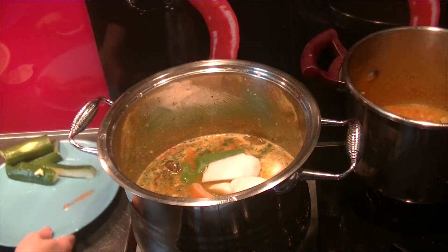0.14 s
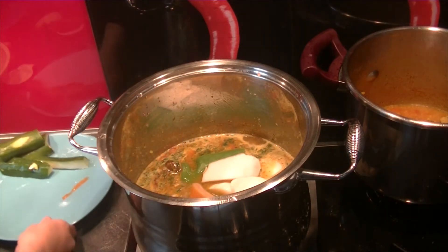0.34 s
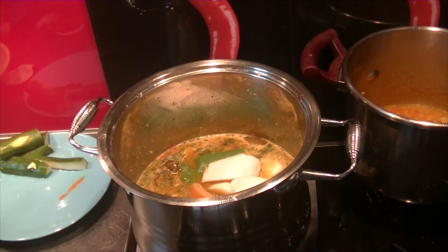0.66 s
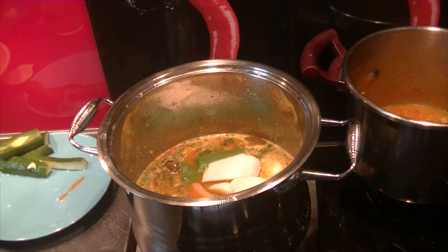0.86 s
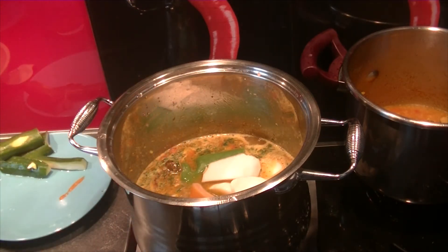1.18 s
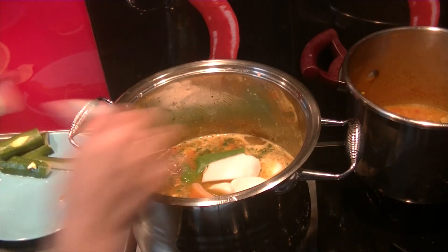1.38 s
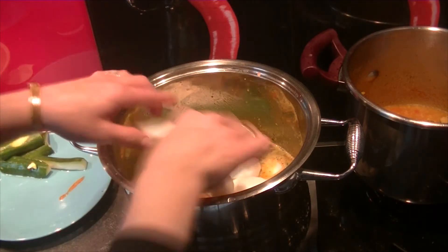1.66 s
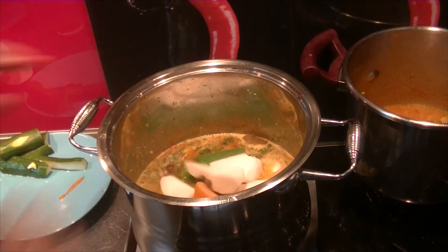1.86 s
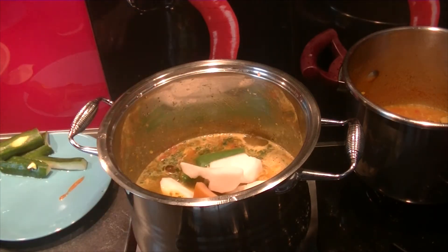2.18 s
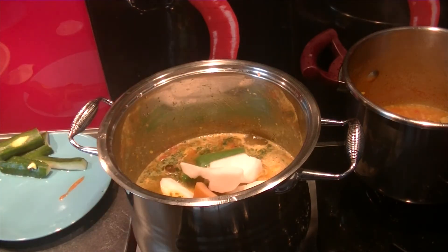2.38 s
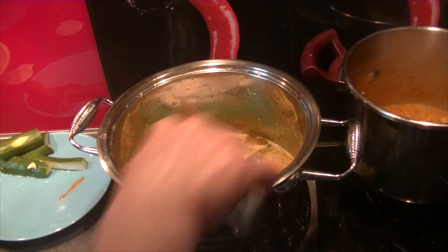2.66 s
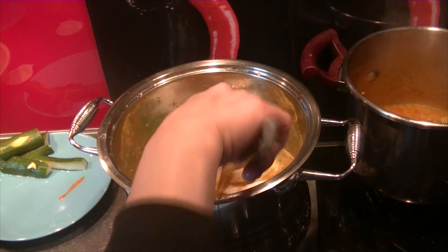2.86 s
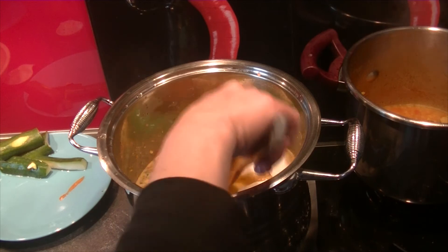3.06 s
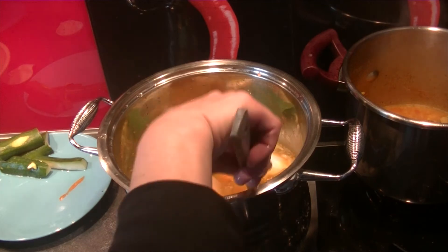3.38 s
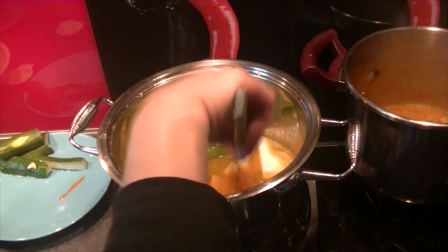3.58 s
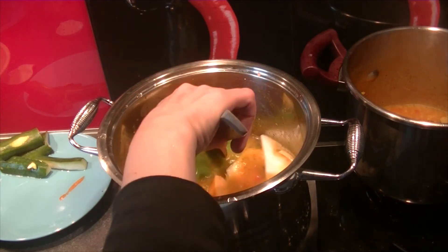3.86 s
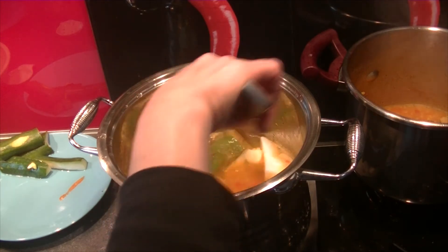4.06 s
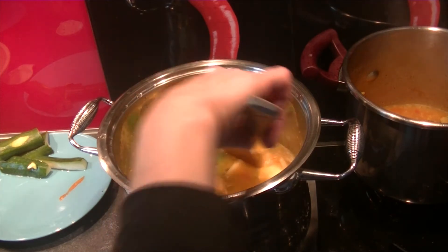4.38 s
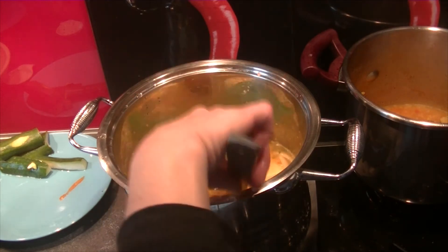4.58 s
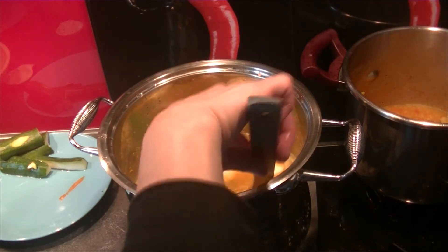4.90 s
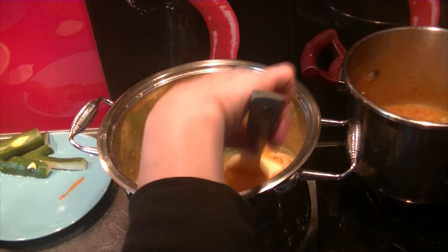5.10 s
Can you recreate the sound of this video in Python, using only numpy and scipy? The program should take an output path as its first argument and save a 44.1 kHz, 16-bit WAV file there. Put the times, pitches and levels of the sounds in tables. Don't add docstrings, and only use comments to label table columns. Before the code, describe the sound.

Right at the start a plate bangs on the worktop, loud enough to overload, rubs briefly, and a board lands in a quick flurry of knocks. After that the simmering pot dominates: soft hiss, bubbling pops, tiny spits on hot metal. A spoon strikes lightly and stirs with small metallic ticks, then a muffled thud lands late. Close small-camera stereo in a lively little kitchen, with faint low worktop rumble.

```python
import sys
import numpy as np
from scipy import signal
from scipy.fft import rfft, irfft, next_fast_len
from scipy.io import wavfile
from scipy.ndimage import uniform_filter1d

SR = 44100
rng = np.random.default_rng(int(sys.argv[2]) if len(sys.argv) > 2 else 0)


def boost(x):
    u = np.asarray(x, float) / 20
    return 10 ** u


def persist_wave(psi):
    counts = np.round(np.clip(psi, -1, 1) * 32767).astype(np.int16)
    wavfile.write(sys.argv[1], SR, np.atleast_2d(counts).T)


N = 230552

# hz, level_db (per Hz)
SIMMER_SPECTRUM = [(20, -22), (60, -18), (256, -18), (380, -6), (715, -10.5), (1090, -1.5), (1410, -5.5),
                   (1780, 0.5), (2650, -8.5), (3420, -7.5), (4120, -9), (7570, -11.5), (10000, -15),
                   (11000, -23.5), (16000, -22)]


def evened(x):
    return x / np.sqrt(np.mean(x ** 2) + 1e-20)


def read(points, hz):
    f, value = np.transpose(points)
    return np.interp(np.log(hz + 1), np.log(f + 1), value)


def curve(points, t):
    s, value = np.transpose(points)
    return np.interp(t, s, value)


def add(mix, s, sound):
    part = mix[..., round(s * SR):][..., :sound.shape[-1]]
    part += sound[..., :part.shape[-1]]


def resonate(x, hz, width):
    pole = np.exp((2j * np.pi * hz - np.pi * width) / SR)
    return signal.lfilter([1], np.poly([pole, pole]), x).real


def causal(gain_db):
    log_gain = np.log(boost(np.r_[gain_db, gain_db[-2:0:-1]]))
    return np.fft.ifft(np.exp(np.conj(signal.hilbert(log_gain)))).real[:2048]


def pot_db(hz):
    # hz, width_hz, lift_db
    resonances = [(375.2, 46, 8.5), (472.8, 32, 8.5), (1050, 102, 4), (1120, 48, 4.5), (1474, 5.5, 12.5),
                  (1730, 540, -2.5), (1930, 62, 1.5), (3400, 256, 7), (5000, 530, 5.5), (7677, 79, 4),
                  (7500, 95, 5.5), (14900, 900, 4)]
    return sum(db / (1 + (2 * (hz - f) / width) ** 2) for f, width, db in resonances)


def simmer(patchy_db=1.0, flicker_db=1.1):
    # start_s, level_db
    simmer_level = [(0.0, -41), (0.38, -36.5), (0.5, -38.5), (0.8, -39), (4.9, -39), (5.23, -37.5)]
    # start_s, treble_db
    stir = [(0.55, 0), (0.72, 0.5), (0.75, -0.2), (2.1, 1.1), (3.49, 0), (3.73, 2), (3.77, -2.2), (3.84, 1),
            (4.07, -2), (4.2, 3), (4.24, -5.5), (4.28, -0.2), (4.53, 0.4), (4.62, 2), (4.69, -0.5),
            (4.89, -0.2), (5.15, -1.5), (5.2, -0.5)]
    stir_from_hz, calm_below_hz = 2900, 1200
    frames, hz = N // 128 + 6, np.fft.rfftfreq(512, 1 / SR)
    a, b, c, d, patches, flicker = rng.standard_normal((frames, 257, 6)).T
    patches = uniform_filter1d(patches, size=6, axis=0)
    patches = evened(uniform_filter1d(patches, size=20, axis=1))
    flicker = uniform_filter1d(flicker, size=110, axis=0)
    flicker = evened(uniform_filter1d(flicker, size=6, axis=1))
    rows = hz[:, None]
    calm = 1 - 0.5 / (1 + (rows / calm_below_hz) ** 4)
    stirred = curve(stir, np.arange(frames) * 128 / SR - 256 / SR)
    stirred = stirred / (1 + (stir_from_hz / (rows + 1)) ** 4)
    softer_treble = -1.5 * (rows > 4500)
    field = boost(calm * (patchy_db * patches + flicker_db * flicker) + stirred + softer_treble)
    noise = np.array([a + 1j * b, c + 1j * d])
    hiss = signal.istft(noise * field, nperseg=512, noverlap=384)[1][:, :N]
    size = next_fast_len(N)
    hz = np.fft.rfftfreq(size, 1 / SR)
    colour = boost(read(SIMMER_SPECTRUM, hz) + pot_db(hz))
    hiss = evened(irfft(rfft(hiss, size) * colour, size)[:, :N])
    return hiss * boost(curve(simmer_level, np.arange(N) / SR) - 1.5)


def bubbles(low_hz, high_hz, per_s, spread_db, level_db, cycles):
    out = np.zeros((2, N))
    for hz in np.geomspace(low_hz, high_hz, num=16):
        t = np.arange(int(4 * cycles / hz * SR)) / SR
        chirp = np.sin(2 * np.pi * hz * t * (1 + 0.0077 * hz * t))
        chirp *= np.exp(-2 * t * hz / cycles) * np.minimum(t * hz, 1)
        bursts = rng.random((2, N)) < per_s / 16 / SR
        size = bursts * 1.
        size[bursts] = boost(spread_db * np.minimum(rng.exponential(1, bursts.sum()), 3.5))
        loud = boost(read(SIMMER_SPECTRUM, hz) + pot_db(hz)) * hz
        out += loud * signal.oaconvolve(size, chirp[None], axes=1)[:, :N]
    return boost(level_db) * evened(out)


def damped_rings(rows, noisy, room_db, attack_cycles, spread=0.71):
    t, out = np.arange(8000) / SR, np.zeros(N)
    for s, db, hz, t60 in rows:
        burst = evened(resonate(rng.standard_normal(len(t)), hz, spread * hz))
        ring = np.sin(2 * np.pi * hz * t) + noisy * burst
        attack = np.minimum(t * hz / attack_cycles, 1)
        add(out, s, boost(db - 60 * t / t60) * ring * attack)
    wet = boost(room_db) * signal.oaconvolve(out[None], kitchen(), axes=1)[:, :N]
    return wet + out * np.array([[1], [0]])


def clear_pops():
    # start_s, peak_db, pitch_hz
    bursts = [(0.818, -36, 2420), (1.0146, -31, 2010), (1.11, -32, 1730), (1.1604, -32.5, 3420),
              (1.401, -32.5, 1730), (1.655, -43, 1820), (1.711, -35, 1140), (2.12, -34, 2000),
              (2.14, -28, 2330), (2.7754, -34, 3320), (3.001, -31.5, 1930), (3.137, -31.5, 2540),
              (3.1855, -48, 1690), (3.2735, -37, 1880), (3.699, -38, 1950), (3.72, -34, 2020),
              (3.7474, -35, 2200), (3.7838, -32.5, 1390), (3.975, -29.5, 2350), (4.1744, -30, 2300),
              (4.2188, -39, 2150), (5.157, -42, 1840)]
    t60_s = 0.027
    return damped_rings([(*row, t60_s) for row in bursts], noisy=0.56, room_db=-6.5, attack_cycles=3.1)


def fizz():
    # start_s, peak_db, pitch_hz
    bursts = [(2.371, -30, 5000), (2.952, -27.5, 4900), (3.284, -25, 3740), (3.5644, -36, 3510),
              (3.6446, -37, 4680), (3.7054, -33, 3570), (3.7878, -29, 3650), (3.8337, -31, 5100),
              (4.0525, -37, 5000), (4.0844, -37, 6800), (4.1076, -39, 5070), (4.1544, -39, 3400),
              (4.62, -27, 3500)]
    t60_s = 0.013
    return damped_rings([(*row, t60_s) for row in bursts], noisy=0.59, room_db=-13.0, attack_cycles=4.0)


def spits():
    # start_s, peak_db, pitch_hz
    drops = [(0.602, -33, 4820), (0.632, -34, 7380), (0.6784, -33, 5150), (0.9314, -37, 7390),
             (1.0425, -35, 4650), (1.3184, -35, 4960), (1.5189, -34, 4480), (1.5858, -30.5, 5400),
             (1.657, -30, 4350), (1.712, -29, 4150), (1.8424, -34, 5490), (1.9904, -27, 4850),
             (2.3999, -29, 4170), (2.5955, -33, 5130), (2.7736, -34, 4950), (3.0689, -39, 5170),
             (3.1358, -34, 4180), (3.1817, -32, 4680), (3.4256, -35, 5050), (3.4684, -42, 4940),
             (3.712, -31, 4360), (3.8674, -35, 4100), (4.1394, -41, 4380), (4.2737, -36, 4870),
             (4.3114, -38, 4250), (4.4144, -28.5, 4960), (4.557, -35, 4960), (4.7142, -32, 4980),
             (4.8424, -31.5, 6930), (4.9781, -39, 4510), (5.0584, -40, 4570), (5.1582, -38, 5130),
             (5.1696, -33, 5000)]
    t60_s, level_db = 0.018, -4.5
    rows = [(s, db + level_db, hz, t60_s) for s, db, hz in drops]
    return damped_rings(rows, noisy=0.93, room_db=-23.0, attack_cycles=1.3)


def small_rings():
    # start_s, peak_db, pitch_hz, t60_s
    pure_rings = [(0.712, -38, 479, 0.065), (0.922, -43, 425, .06), (0.969, -41, 1090, .04),
                  (1.184, -34, 1040, .05), (1.2218, -34, 3330, 0.022), (1.23, -36, 1140, .04),
                  (1.328, -36, 1120, .04), (1.421, -34, 1070, 0.036), (2.0998, -35, 3490, .02),
                  (2.705, -33, 2000, .025), (3.137, -31, 2480, 0.032), (3.49, -38, 368, 0.21),
                  (3.63, -37.5, 373, .1), (3.982, -35.5, 415, 0.052), (4.0525, -33, 5000, .02),
                  (4.1076, -34, 4850, .02), (4.383, -41, 433, 0.11), (4.409, -39, 1150, .04),
                  (4.44, -36, 2140, .02), (4.862, -41, 473, .15), (5.014, -39, 494, 0.13),
                  (0.0385, -14, 820, .04), (0.307, -33, 400, .06), (0.424, -23, 342, 0.049),
                  (0.445, -28, 515, 0.068), (0.445, -33.5, 197, .2), (0.462, -29, 790, 0.092),
                  (2.2, -24, 2050, .025), (2.203, -24, 2500, .025), (2.21, -35, 520, .12),
                  (2.335, -36, 1050, 0.072), (4.885, -35, 845, 0.048), (4.886, -35, 475, 0.063),
                  (2.368, -41, 1060, 0.11), (4.8435, -34, 1540, 0.046)]
    return damped_rings(pure_rings, noisy=0.26, room_db=-11.5, attack_cycles=1.7, spread=0.32)


def knock(blows, colour, rings, ring_db, room_db, near, scatter_db, scatter_s=0.0063):
    crack = causal(read(colour, np.fft.rfftfreq(4096, 1 / SR)))
    crack = crack / abs(crack).max()
    t, out = np.arange(SR // 3) / SR, np.zeros((2, N))
    for s, db, top_hz in blows:
        share = rng.choice([-1, 1], len(rings)) * rng.uniform(0.45, 1, len(rings))
        ring = np.zeros(len(t))
        for k, (hz, level_db, t60) in zip(share, rings):
            ring += k * boost(level_db - 60 * t / t60) * np.sin(2 * np.pi * hz * t)
        echo = kitchen()[:, :len(t)] * (boost(room_db) + boost(scatter_db) * np.exp(-t / scatter_s))
        sound = signal.fftconvolve(crack[None], echo, axes=1)[:, :len(t)]
        sound += boost(ring_db) * ring * np.array([[1], [0.6]])
        sound[0, :len(crack)] += near * crack
        soft = signal.butter(3, top_hz, fs=SR, output="sos")
        add(out, s, boost(db) * signal.sosfilt(soft, sound))
    return out


def plate():
    # start_s, peak_db, brightness_hz
    blows = [(.0061, 2.5, 5400), (.0082, -8.5, 3470), (.0131, -12, 3000), (.0255, -2.5, 1300),
             (.047, -10, 1800), (.060, -11, 1500)]
    # hz, level_db (per Hz)
    colour = [(59, -44), (100, -26), (194, -20), (246, -27), (272, -13.5), (375, -6), (607, -9),
              (760, -8.5), (960, -4.5), (1350, -10), (2100, -7.5), (3600, -17), (4900, -28.5), (6200, -27),
              (12000, -34), (15600, -90), (22000, -120)]
    # pitch_hz, level_db, t60_s
    rings = [(201, -19.5, 0.39), (363, -8, 0.12), (844, -11, 0.2), (975, -17, 0.6), (1010, -0.5, 0.065),
             (1520, -23, 0.14), (1700, -13, 0.14), (2030, -6, 0.3), (2200, -4.5, 0.088), (3210, -13, 0.22),
             (4600, -18, 0.073)]
    return knock(blows, colour, rings, ring_db=-14.5, room_db=-1.5, near=1.0, scatter_db=-10.0)


def board():
    # start_s, peak_db, brightness_hz
    blows = [(.397, -14, 1600), (.4005, -9, 3800), (.4035, -10, 3000), (.4062, -4.5, 6040),
             (.409, -2, 2980), (.4155, -0.5, 2210), (.428, -17, 2020), (.4385, -15, 4000),
             (.450, -15, 1190), (.4665, -15, 1500), (.475, -21, 5500)]
    # hz, level_db (per Hz)
    colour = [(59, -71), (100, -34), (194, -26), (241, -32), (346, -19), (423, -10), (497, -8), (787, -4.5),
              (1270, -4.5), (1980, -5), (3700, -13.5), (5000, -14.5), (6300, -24), (12000, -33),
              (15600, -75), (22000, -120)]
    # pitch_hz, level_db, t60_s
    rings = [(197.7, -30, 0.56), (350, -8, 0.079), (501, 5, 0.095), (785, -9.5, 0.18), (960, -2, 0.11),
             (1120, -9, 0.3), (1500, -9, 0.11), (1634, -7, 0.17), (2010, -4.5, 0.13), (2470, -20, 0.13),
             (3330, 2, 0.074), (4600, -5.5, 0.061)]
    return knock(blows, colour, rings, ring_db=-18.5, room_db=-4.5, near=0.84, scatter_db=1.0)


def spoon():
    # start_s, peak_db, brightness_hz
    blows = [(2.1918, -13.5, 5500), (2.197, -17.5, 4000), (2.202, -22, 2600), (2.221, -26, 2600),
             (2.249, -21, 2200), (2.2525, -18, 1800), (2.257, -24, 1700), (2.268, -22, 800),
             (2.290, -28, 2500), (2.305, -21, 1210), (2.34, -29, 1200), (2.37, -28, 1200)]
    # hz, level_db (per Hz)
    colour = [(120, -55), (200, -22.5), (453, -9.5), (1140, -5), (2430, -3), (3130, -9), (4350, -25),
              (5600, -35), (7000, -27), (9100, -56), (15400, -120)]
    # pitch_hz, level_db, t60_s
    rings = [(493, -16.5, 0.2), (584, -17, 0.38), (654, -23.5, 0.53), (885, -18, 0.08), (1477, -3, 0.047),
             (1900, -10, 0.027), (2300, -5, 0.03), (2720, -5, 0.069)]
    return knock(blows, colour, rings, ring_db=-8.0, room_db=-1.0, near=0.9, scatter_db=-5.0)


def step():
    # start_s, peak_db, brightness_hz
    blows = [(4.8428, -26.5, 2500), (4.8452, -26, 3500), (4.853, -33, 1500), (4.882, -33, 2600),
             (4.887, -31, 1100), (4.900, -28, 1200), (5.020, -33.5, 900), (5.070, -34, 900)]
    # hz, level_db (per Hz)
    colour = [(59, -32), (100, -6), (490, 3), (609, -7), (816, 1), (1130, -3), (1320, -3), (1610, 0),
              (4000, -6), (5200, -53), (8800, -120)]
    # pitch_hz, level_db, t60_s
    rings = [(366, -5, 0.22), (487, -2, 0.22), (807, -1, 0.12), (1090, -4, 0.19), (1620, 5, 0.048),
             (2090, -12, .05)]
    return knock(blows, colour, rings, ring_db=-12, room_db=-5, near=1.1, scatter_db=-8.0)


def drag():
    # start_s, level_db
    pressure = [(0.1, -48), (0.15, -42.5), (0.21, -44), (0.31, -36.5), (0.36, -41), (0.395, -38)]
    squeak_db, squeak_fade_db_per_s = 3, -26
    t = np.arange(pressure[0][0], pressure[-1][0], 1 / SR)
    grit = rng.standard_normal((4, len(t)))
    low = evened(resonate(grit[:2], 328, 127) + 0.44 * resonate(grit[:2], 622, 99))
    high = evened(resonate(grit[2:], 2120, 230) + 5.9 * resonate(grit[2:], 3140, 680))
    no_bass = signal.butter(4, 250, "high", fs=SR, output="sos")
    low = signal.sosfilt(no_bass, low)
    rub = low + boost(squeak_db + squeak_fade_db_per_s * (t - t[0])) * high
    out = np.zeros((2, N))
    add(out, t[0], boost(curve(pressure, t)) * rub * signal.windows.tukey(len(t), .1))
    return out


def spoon_ticks():
    # start_s, peak_db, pitch_hz, t60_s
    touches = [(3.7205, -25, 3200, 0.014), (3.7225, -28, 2690, 0.019), (3.7235, -31.5, 2030, 0.023),
               (3.8592, -19, 2750, 0.011), (3.8625, -31, 2160, 0.019), (4.2155, -35, 6450, .012),
               (4.618, -28, 4600, 0.012), (4.768, -31, 2240, 0.017), (4.8455, -30.5, 1620, 0.041),
               (2.2505, -29, 1520, 0.033), (2.1925, -25, 2340, 0.034)]
    return damped_rings(touches, noisy=0.4, room_db=-9.5, attack_cycles=1.0)


def clinks():
    # start_s, peak_db, pitch_hz, t60_s
    steel = [(2.195, -35.5, 4410, 0.18), (2.213, -36, 4450, 0.07), (2.235, -43, 3900, .1),
             (2.262, -37, 5100, 0.05), (0.011, -33, 5350, 0.1), (0.012, -30, 4600, 0.049)]
    return damped_rings(steel, noisy=0.45, room_db=-9, attack_cycles=12.0)


def bumps():
    # start_s, peak_db, pitch_hz, t60_s
    contacts = [(0.288, -26, 296, 0.11), (0.305, -34, 404, 0.084), (0.33, -45, 292, 0.071),
                (0.372, -26, 377, 0.048), (0.399, -9.5, 333.3, 0.058), (0.455, -43, 200, .15),
                (1.77, -26, 472, 0.036), (2.883, -37, 1012, 0.091), (2.889, -34.5, 944, 0.12),
                (3.149, -41.5, 345, 0.16), (3.273, -35.5, 1120, 0.12), (3.488, -34.5, 479, 0.13),
                (3.628, -36, 1120, 0.06), (4.135, -39.5, 470, 0.11), (4.488, -32.5, 432, 0.042),
                (4.846, -34.5, 143, 0.18), (4.884, -36, 645, 0.093), (5.022, -40, 477, 0.06),
                (5.042, -43, 423, 0.061), (5.152, -39, 371, 0.068)]
    return damped_rings(contacts, noisy=0.39, room_db=-10.0, attack_cycles=2.06, spread=0.21)


def brief_rings():
    # start_s, peak_db, pitch_hz, t60_s
    contacts = [(0.32, -33.5, 2050, .2), (0.12, -33, 2300, .07), (0.275, -34, 2350, 0.045),
                (0.29, -42, 3800, .12), (1.7661, -36, 1940, .02), (2.16, -40, 3400, 0.067),
                (2.6082, -34, 2400, .012), (2.897, -37, 375, 0.18), (3.27, -38.5, 400, 0.091),
                (3.8344, -30, 2340, 0.025), (4.3, -32, 1700, 0.037), (4.9, -46, 3450, .06),
                (4.298, -30, 1370, 0.018), (4.8435, -32.5, 720, 0.028), (2.192, -21.5, 1500, 0.033),
                (2.254, -28, 1450, 0.036), (4.856, -27, 1600, .02), (4.866, -35, 530, 0.029),
                (4.893, -30, 500, 0.035), (4.5, -38, 450, 0.039), (4.8475, -33, 2650, .015),
                (4.8815, -28, 2200, .02), (4.865, -36, 330, 0.12), (4.5, -42, 306, 0.12),
                (2, -39.5, 340, 0.066), (1.6, -44.5, 120, .12), (1.775, -40, 600, 0.046),
                (0.33, -35.5, 1260, 0.065), (0.52, -35, 5600, 0.018), (0.0125, -13, 2000, .02),
                (0.0235, -11.5, 950, 0.026), (2.89, -37, 2450, 0.057), (4.888, -35, 750, 0.057)]
    return damped_rings(contacts, noisy=0.37, room_db=-6.0, attack_cycles=1.5)


def shaking_db():
    # start_s, peak_db, held_s
    leans = [(0.02, -74, .03), (0.12, -66, 0.045), (0.72, -75, .08), (1.0, -72, .02), (1.24, -70, 0.096),
             (1.61, -73, .03), (1.73, -59, .03), (1.8, -52, 0.017), (1.88, -62, .12), (2.8, -69, .05),
             (2.94, -61, .02), (3.04, -62, .02), (3.19, -67, .03), (3.3, -63, 0.025), (3.44, -55.5, 0.051),
             (3.56, -55, 0.057), (3.7, -67, .07), (3.845, -64, .02), (3.96, -67, .03), (4.16, -68.5, 0.1),
             (4.48, -68, .09), (4.64, -69, .01), (4.91, -51, 0.041), (5.04, -54, .05), (5.16, -58, .05)]
    rise_db_per_s, fall_db_per_s, rest_db = 233, 193, -82
    t = np.arange(0, N + 64, 64) / SR
    s, db, held = np.transpose(leans)[:, :, None]
    rise = rise_db_per_s * np.maximum(s - t, 0)
    fall = fall_db_per_s * np.maximum(t - s - held, 0)
    power = boost(2 * (db - rise - fall)).sum(axis=0) + boost(2 * rest_db)
    return np.interp(np.arange(N) / SR, t, 10 * np.log10(power))


def hum():
    level_db = shaking_db()
    waver = evened(uniform_filter1d(rng.standard_normal(N), size=3000))
    tone = np.sqrt(2) * np.sin(2 * np.pi * np.cumsum(57.5 + 2.0 * waver) / SR)
    thump = evened(resonate(rng.standard_normal((2, N)), 27, 30))
    rumble = evened(resonate(rng.standard_normal((2, N)), 204, 140))
    shaken = boost(level_db) * (tone * np.array([[1.2], [0]]) + 0.3 * thump)
    return shaken + boost(0.4 * level_db - 37.5) * rumble


def kitchen():
    # hz, t60_s
    decay = [(150, 0.41), (500, 0.33), (2000, 0.32), (6000, 0.35), (12000, 0.076)]
    taps_in = np.zeros((2, SR // 3))
    slots = np.arange(60, SR // 3 - 12, 12)
    at = slots + rng.integers(0, 12, (2, len(slots)))
    np.put_along_axis(taps_in, at, rng.choice([-1., 1.], at.shape), 1)
    hz, t, z = signal.stft(taps_in, SR, nperseg=128)
    tail = signal.istft(z * boost(-60 * t / read(decay, hz)[:, None]), SR, nperseg=128)[1]
    return tail / np.linalg.norm(tail[0])


def ports(first, second, aside=((1, 0), (2, 0))):
    # hz, likeness (0 to 1)
    likeness = [(55, .95), (110, .3), (200, .15), (340, .85), (500, .85), (680, .7), (900, .88),
                (2000, .82), (4000, .8), (6000, .7), (8000, .7), (9300, .62), (11000, .33), (15000, .5)]
    # hz, level_db
    louder = [(55, 4), (200, 2), (340, 6.5), (700, 8), (1100, 6), (1800, 2), (3000, 0), (5000, 0),
              (6100, 2), (7100, 8), (8100, 6), (9300, 0), (11000, -3), (13000, 2)]
    # hz, phase_rad
    leads = [(55, 0), (340, -.1), (680, -.1), (1100, -.5), (1800, -.5), (3000, -.1), (6000, .2),
             (7100, -.3), (8100, -1.2), (9300, -1.6), (11000, -.6), (15000, -.4)]
    size = next_fast_len(N + 8192)
    hz, a, b = np.fft.rfftfreq(size, 1 / SR), rfft(first, size), rfft(second, size)
    same = np.clip(read(likeness, hz), 0, 1)
    right = same * np.exp(-1j * read(leads, hz)) * a + np.sqrt(1 - same ** 2) * b
    half = boost((read(louder, hz) + read(aside, hz)) / 2)
    return irfft(np.array([a * half, right / half]), size)[:, :N]


def scene():
    # hz, extra_left_minus_right_db
    knock_side = [(250, 0), (600, 2.2), (1500, 1.5), (4000, .3)]
    small = drag() + plate() + board() + spoon() + step()
    small += clear_pops() + fizz() + spoon_ticks() + clinks() + bumps()
    no_bass = signal.butter(6, 150, "high", fs=SR, output="sos")
    small = signal.sosfilt(no_bass, small)
    small = small - signal.lfilter(*signal.iirpeak(243, 6.5, fs=SR), small)
    small += small_rings()
    broth = simmer()
    broth += bubbles(1485, 13910, per_s=250, spread_db=3.0, level_db=-51.5, cycles=11.6)
    broth += bubbles(3640, 12300, per_s=300, spread_db=2.5, level_db=-66, cycles=4.5)
    broth += spits() + brief_rings() + hum()
    return ports(*small, aside=knock_side) + ports(*broth)


def top_cut(x):
    return signal.sosfilt(signal.butter(12, 15790, fs=SR, output="sos"), x)


def record(dry):
    limited = np.clip(dry, -1, 1)
    edge = signal.firwin(1023, 15760, window=("kaiser", 10), fs=SR)
    limited = signal.oaconvolve(limited, edge[None], "same")
    return top_cut(limited)


dry = scene()
out = record(dry)
persist_wave(out)
```